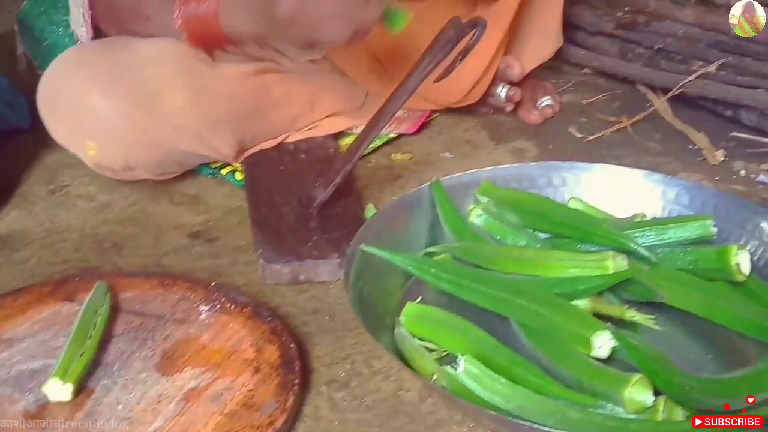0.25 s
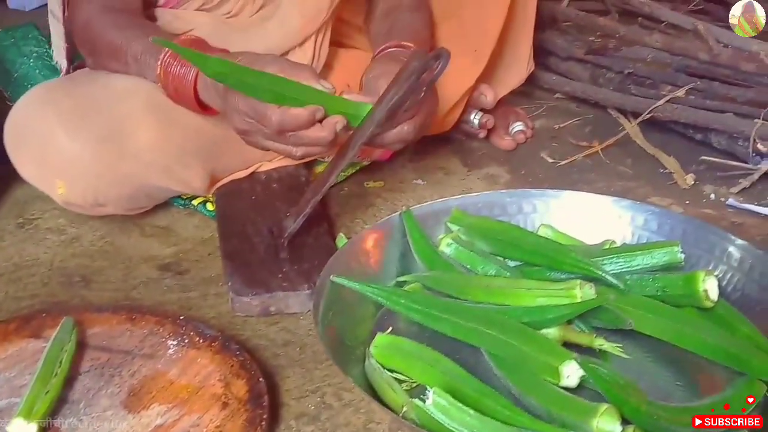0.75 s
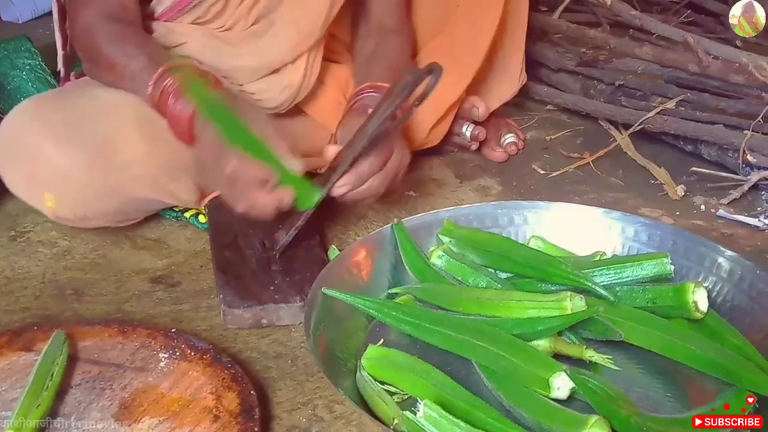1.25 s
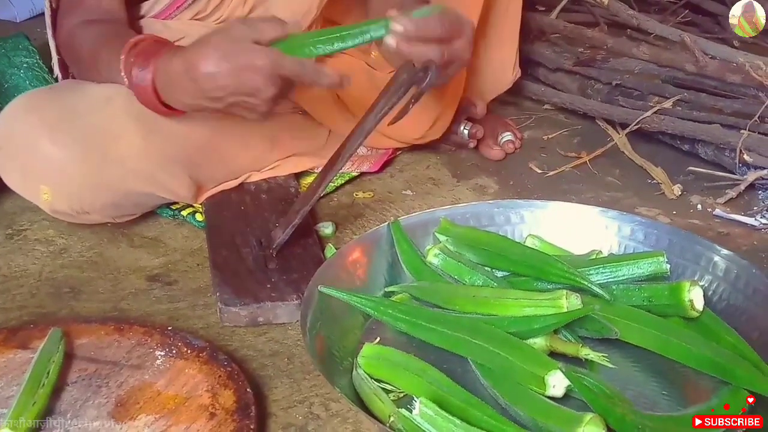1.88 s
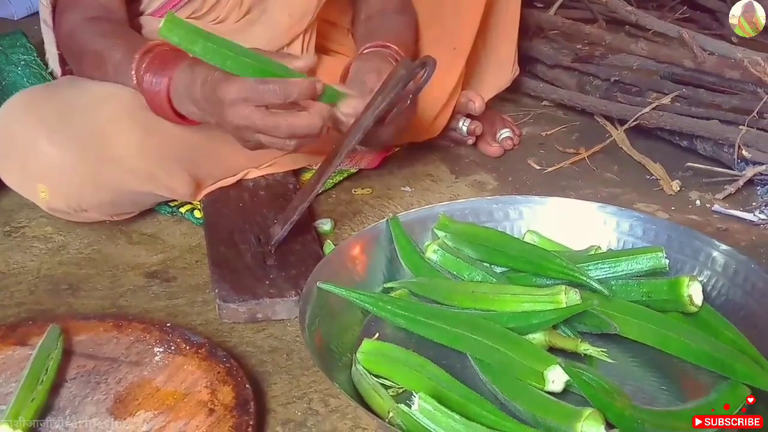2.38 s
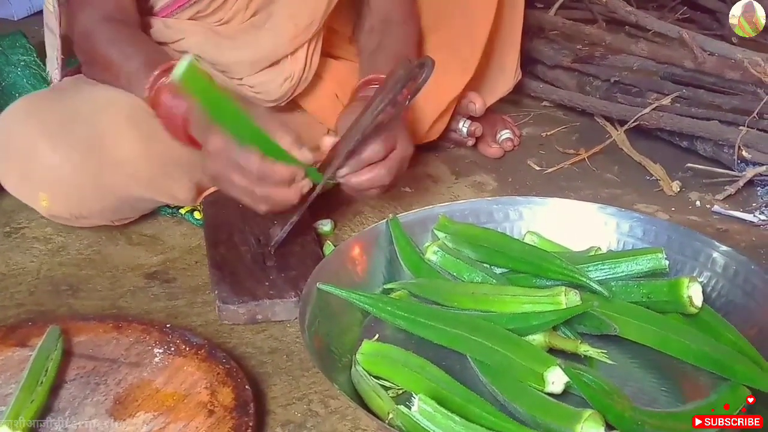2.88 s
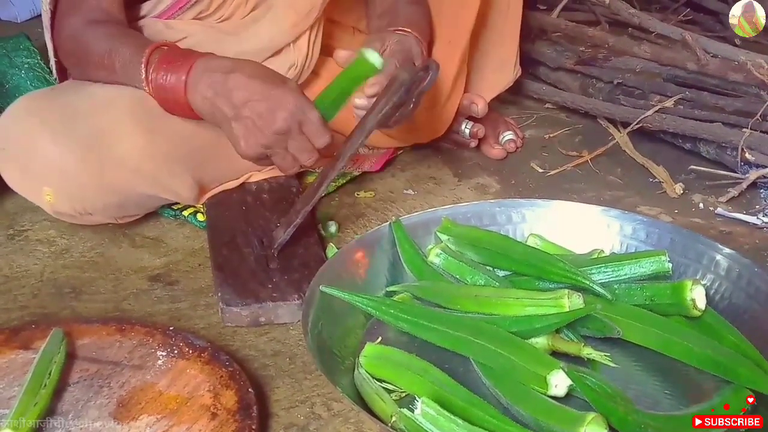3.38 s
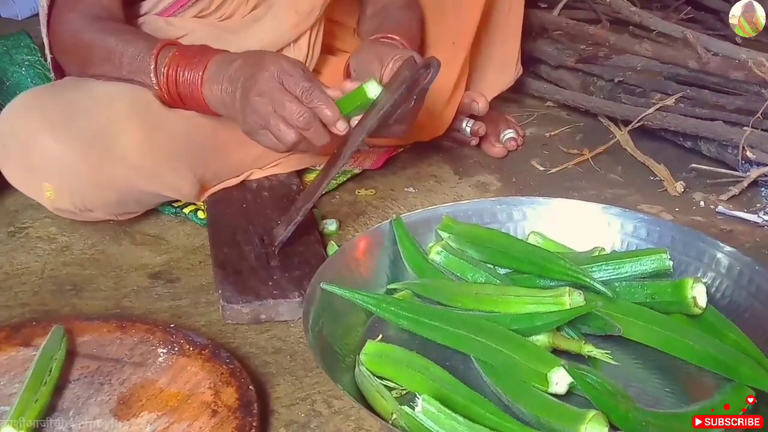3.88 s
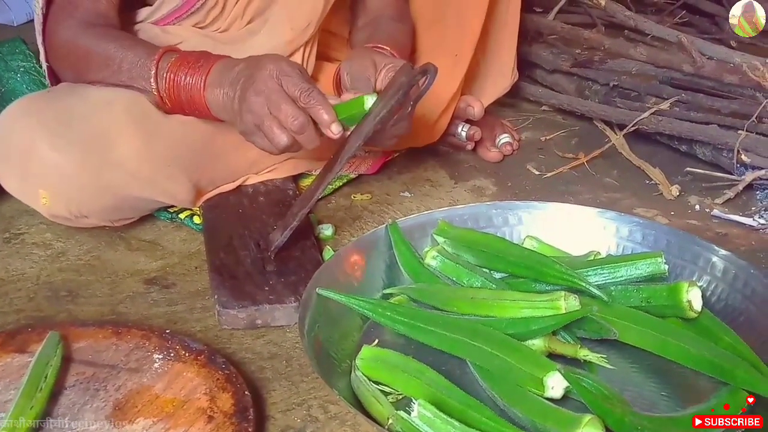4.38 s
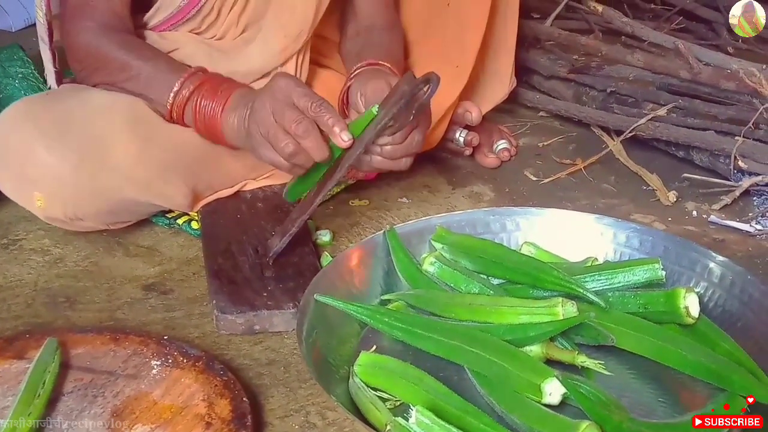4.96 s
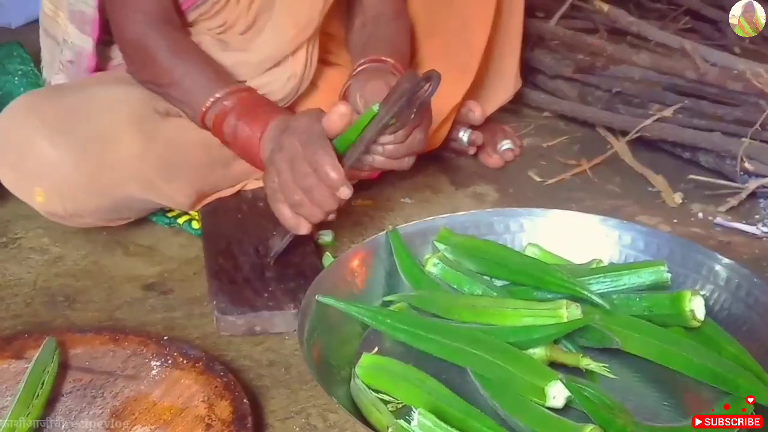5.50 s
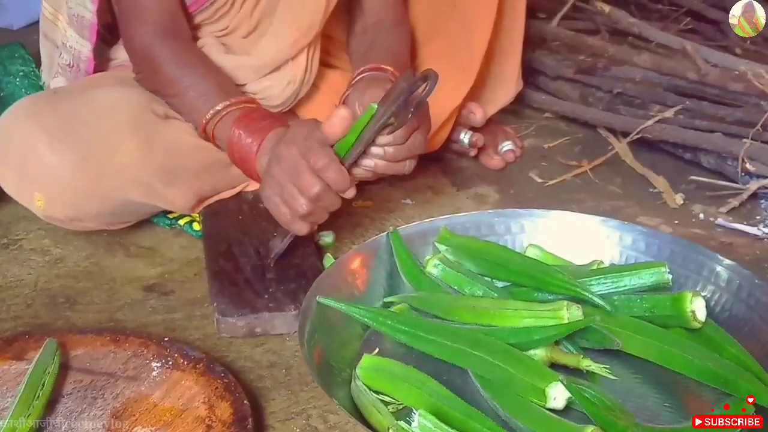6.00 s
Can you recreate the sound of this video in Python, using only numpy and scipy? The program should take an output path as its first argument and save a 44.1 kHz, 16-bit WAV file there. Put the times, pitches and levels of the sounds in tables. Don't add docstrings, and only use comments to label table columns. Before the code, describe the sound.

Close, crisp snaps and scrapes of okra on a fixed blade, glassy bangle clinks, and hens clucking and crying with hard yard echo.

```python
import sys
import numpy as np
from scipy import signal
from scipy.fft import rfft, irfft
from scipy.io import wavfile
from scipy.ndimage import uniform_filter1d

SR = 44100
rng = np.random.default_rng(int(sys.argv[2]) if len(sys.argv) > 2 else 0)


def to_wav(sig):
    pcm = np.clip(np.atleast_2d(sig), -1, 1) * 32767
    pcm = np.round(pcm).astype(np.int16)
    wavfile.write(sys.argv[1], SR, pcm.T)


def nominal_scale(level):
    x = np.asarray(level, float) / 20
    return 10 ** x


N = 275184


def evened(x):
    return x / np.sqrt(np.mean(x ** 2) + 1e-20)


def read(points, hz):
    f, value = np.transpose(points)
    return np.interp(np.log(hz + 1), np.log(f + 1), value)


def add(mix, s, sound):
    part = mix[max(round(s * SR), 0):][:len(sound)]
    part += sound[:len(part)]


def events(table, source):
    out = np.zeros(N)
    for row in table:
        add(out, *source(*row))
    return out


def along(rows, t):
    s, *columns = np.transpose(rows)
    return [np.interp(t, s, c) for c in columns]


def span(rows):
    return np.arange(rows[0][0], rows[-1][0], 1 / SR)


def resonate(x, hz, width_hz):
    turn = np.exp(2j * np.pi * np.cumsum(hz * np.ones(len(x))) / SR)
    r = np.exp(-np.pi * abs(width_hz) / SR)
    smooth = signal.lfilter([(1 - r) ** 2], [1, -2 * r, r * r], x / turn)
    return 2 * (turn * smooth).real


def colour(x, points):
    hz = np.fft.rfftfreq(len(x), 1 / SR)
    return evened(irfft(rfft(x) * nominal_scale(read(points, hz)), len(x)))


def wobble(length, smooth):
    noise = rng.standard_normal(length)
    return evened(uniform_filter1d(uniform_filter1d(noise, int(smooth)), int(smooth)))


def patchy(points, patchy_db):
    frames, hz = N // 128 + 6, np.fft.rfftfreq(512, 1 / SR)
    a, b, patches = rng.standard_normal((frames, 257, 3)).T
    patches = uniform_filter1d(uniform_filter1d(patches, size=5, axis=0), size=30, axis=1)
    level = nominal_scale(read(points, hz)[:, None] + patchy_db * evened(patches))
    return evened(signal.istft((a + 1j * b) * level, nperseg=512, noverlap=384)[1][:N])


def wind():
    # (time [s], level [dB], centre [Hz])
    hum = [(0, -81, 124.5), (1.2, -77.5, 104), (2.2, -80.5, 121.6), (2.95, -67.5, 165.4),
           (3.15, -50.5, 89.3), (3.3, -57, 199), (3.42, -49.5, 200), (3.6, -61.5, 113.4), (3.95, -56, 144),
           (4.2, -55.5, 72), (4.52, -54.5, 84.6), (4.78, -58.5, 127.3), (4.92, -70, 155),
           (5.15, -57, 120.5), (5.38, -73.5, 151), (5.58, -59.5, 124), (5.72, -59, 111), (5.9, -56, 110.7)]
    # (frequency [Hz], density [dB per Hz])
    wind_spectrum = [(20, -38), (43, -49), (86, 2.5), (193, 1), (268, -25), (400, -17.5), (520, -94),
                     (880, -120)]
    level_db, hz = along(hum, np.arange(N) / SR)
    gusts = colour(rng.standard_normal(N), wind_spectrum)
    moan = evened(resonate(rng.standard_normal(N), hz, 14))
    return nominal_scale(level_db + 2.26 * wobble(N, 790)) * evened(gusts + 1.05 * moan)


def yard():
    # (time [s], level [dB])
    yard_level = [(0, -57.5), (.35, -64.5), (.48, -77.5), (.9, -64.5), (1.05, -66.5), (1.38, -97),
                  (1.6, -68), (1.9, -86), (2.5, -65.5), (3.1, -63), (3.4, -67.5), (3.7, -63), (3.9, -62),
                  (4.5, -57.5), (5.2, -63.5), (5.4, -62.5), (6.05, -68), (6.24, -54.5)]
    # (frequency [Hz], density [dB per Hz])
    rustle = [(400, -48), (620, 0), (780, -35), (1000, 1), (1500, -18.5), (2400, -8), (3100, -22),
              (4100, -7.5), (5300, -2), (6500, -9), (8000, -19), (10000, -13.5), (12500, -55)]
    level_db = along(yard_level, np.arange(N) / SR)[0]
    return nominal_scale(level_db) * patchy(rustle, patchy_db=6.0)


def hiss(s, peak_db, swell_s, length_s):
    # (frequency [Hz], density [dB per Hz])
    air = [(1200, -12), (2000, -4), (3000, -5), (4100, 4), (5500, -5), (7500, -7), (10500, -19),
           (15500, -27.5), (17000, -64)]
    t = np.arange(int(length_s * SR) + 2000) / SR
    swell = np.sin(np.pi / 2 * np.clip(t / swell_s, 0, 1)) ** 2
    shape = swell * nominal_scale(-60 * np.maximum(t - length_s + 0.066, 0) / 0.14)
    flutter = nominal_scale(peak_db + 0.9 * wobble(len(t), 350))
    return s, flutter * colour(rng.standard_normal(len(t)), air) * shape


def croon(s, length_s, level_db, hz):
    fade_db, sag_per_s, width_hz = -10, 0.082, 110
    t = np.arange(0, length_s, 1 / SR)
    pitch_hz = hz * (1 - sag_per_s * t) + width_hz / 3 * wobble(len(t), 400)
    fuzz = evened(resonate(rng.standard_normal(len(t)), pitch_hz, width_hz))
    tone = np.sin(2 * np.pi * np.cumsum(pitch_hz) / SR) + .7 * fuzz
    return s, nominal_scale(level_db + fade_db * t / length_s) * tone * signal.windows.tukey(len(t), .4)


def clink(s, middle_db, wide_db, thin_db):
    # (frequency [Hz], level [dB], t60 [s])
    rings = [
        [(9720, 0, .17), (10450, -4, .15), (10780, -2, .2), (11250, -1, .2)],
        [(12060, 0, .17), (12350, -1, .16), (15440, -11, .14)],
        [(13120, -9, .12), (13490, -10, .12), (14350, 0, .11), (7560, -7, .11)],
        [(6500, -3, .2), (5100, -7, .22), (5900, -6, .15)],
    ]
    t, out = np.arange(7500) / SR, 0
    rattle = rng.standard_normal(len(t))
    for group_db, modes in zip((middle_db, wide_db, thin_db, wide_db), rings):
        for hz, db, t60_s in modes:
            uneven_db, detune, phase = rng.uniform(-6, 4), rng.uniform(.995, 1.005), rng.random()
            tone = np.sin(2 * np.pi * (hz * detune * t + phase))
            ring = .6 * tone + .6 * evened(resonate(rattle, hz * detune, 130))
            blur = .35 * evened(resonate(rattle[::-1], hz, 600)) * nominal_scale(-60 * t / .25)
            out = out + nominal_scale(group_db + db + uneven_db - 60 * t / t60_s) * (ring + blur)
    return s - .001, out * np.minimum(t / 0.00092, 1)


def rasp(s, peak_db, dull_db, crisp_db, stroke_s, snap_db, grain_db, chatter_db=0):
    # (frequency [Hz], density [dB per Hz])
    scrape = [(500, -21), (1000, -9), (2100, -1.5), (3400, -5), (3700, -0.5), (4000, -7), (5500, -2),
              (7500, -9.5), (10600, -19.5), (11300, -31.5)]
    chatter_hz = 90
    t = np.arange(-200, 6000) / SR
    shape = nominal_scale(-60 * np.maximum(t - stroke_s, 0) / 0.11) * np.clip(t / 0.0086, 0, 1)
    shape = shape + nominal_scale(snap_db + 8 - 60 * abs(t) / 0.032) * (t > 0)
    noise = rng.standard_normal(len(t))
    grain = nominal_scale(grain_db * np.minimum(rng.exponential(1, len(t)), 6))
    fibres = shape * evened(noise * grain)
    skips = np.cumsum(chatter_hz * (1 + .2 * wobble(len(t), 300))) / SR + rng.random()
    fibres = fibres * nominal_scale(chatter_db * (1 - 4 * (skips % 1)) / 2)
    tilt = [(f, db + (dull_db + 14.0) * np.clip((4100 - f) / 1400, 0, 1)) for f, db in scrape]
    crisp = nominal_scale(crisp_db) * colour(fibres, [(7000, -23.0), (10500, -2), (15000, -6.5), (16000, -25)])
    return s - .002 + t[0], nominal_scale(peak_db - 14.5) * (colour(fibres, tilt) + crisp) * np.std(fibres)


def cut(s, peak_db, dull_db, stroke_s, snap_db):
    crisp_db = -5.5 - 200 * stroke_s
    return rasp(s, peak_db, dull_db, crisp_db, stroke_s, snap_db, grain_db=2.7)


def syrinx(hz, rough, jitter, limp):
    flutter_db = 4
    turns = np.cumsum(hz * (1 + jitter * wobble(len(hz), 150))) / SR + rng.random()
    pulses = 0
    for k in range(2, 13):
        pulses = pulses + nominal_scale(flutter_db * wobble(len(hz), 307)) * np.cos(2 * np.pi * k * turns)
    pulses = pulses * (1 + limp * np.cos(np.pi * turns))
    puffs = (0.034 + np.exp(-(turns % 1) / 0.12)) * rng.standard_normal(len(hz))
    drive = np.sqrt(1 - rough) * evened(pulses) + np.sqrt(rough) * evened(puffs)
    low = nominal_scale(flutter_db / 2 * wobble(len(hz), 310) + 1) * np.cos(2 * np.pi * turns)
    return drive, low


def squawk(rows, cavities, rough, jitter):
    throat_width_hz, grate_db, grate_width_hz = 930, -8, 330
    t = span(rows)
    effort_db, hz, throat_hz, bright_db, low_db = along(rows, t)
    drive, low = syrinx(hz, rough, jitter, 0.23)
    top = 0
    for k, (f, width_hz, db) in enumerate(cavities):
        top = top + (-1) ** k * nominal_scale(db) * resonate(drive, f, width_hz)
    air = resonate(rng.standard_normal(len(t)), 0.905 * throat_hz, grate_width_hz)
    grate = nominal_scale(grate_db) * evened(air)
    throat = resonate(resonate(drive, throat_hz, throat_width_hz), throat_hz, throat_width_hz)
    voice = evened(evened(throat) + grate) + nominal_scale(bright_db) * evened(top) + nominal_scale(low_db) * low
    effort = nominal_scale(effort_db + 1.5 * wobble(len(t), 270))
    return t[0], effort * voice * signal.windows.tukey(len(t), .3)


def hoarse_cry(s, length_s, effort_db, top_hz, sag, extra_db=0, rough=.2, jitter=.011):
    # (frequency [Hz], width [Hz], level [dB])
    beak_open = [(2094, 310, 12.5), (2583, 560, 10.5), (3763, 150, 9.5)]
    chest_db = -16.5
    u = np.linspace(0, 1, num=24)
    hz = top_hz * (1 - sag * np.sin(np.pi / 2 * np.clip(u / .6, 0, 1)) ** 2)
    effort_db = effort_db + 2.5 * np.exp(-u / 0.89) - 9.5 * u ** 3
    throat_hz = 395 + 1.47 * hz
    bright_db = extra_db - 9.5 + 0.029 * (hz - 600)
    rows = np.transpose([s + length_s * u, effort_db, hz, throat_hz, bright_db, chest_db + 0 * u])
    return squawk(rows, beak_open, rough, jitter)


def cluck(s, peak_db, second_hz, low_db, beak_db, length_s):
    beak_hz, side_hz, side_db, third_db = 2159, 2429, -6.5, -7.5
    u = np.linspace(0, 1, int(np.clip(length_s, .02, .15) * SR * 2))
    scoop = rng.uniform(.03, .1) * np.exp(-u / .15)
    sag = rng.uniform(.05, .16) * u ** 2
    hz = second_hz / 2 * (1.02 - scoop - sag)
    drive, low = syrinx(hz, .3, .024, .75 * np.exp(-u / .3))
    voice = resonate(drive, 2 * hz, 163) + nominal_scale(third_db) * resonate(drive, 3 * hz, 150)
    gape_hz = 1200 + rng.uniform(120, 280) * u
    voice = evened(voice + 0.96 * resonate(drive, gape_hz, 170))
    breath = drive + 2.0 * rng.standard_normal(len(u))
    beak = resonate(breath, beak_hz * rng.uniform(0.91, 1.05), 90)
    beak = evened(beak + nominal_scale(side_db) * resonate(breath, side_hz, 200))
    moment = np.exp(-((u - .35) / 0.17) ** 2)
    voice = voice + moment * nominal_scale(low_db + 8.5) * low
    voice = voice + np.roll(moment, len(u) // 8) * nominal_scale(beak_db + 3) * beak
    level = nominal_scale(peak_db - 12.0 + 2.78 * wobble(len(u), 155))
    return s - .01, level * voice * np.sin(np.pi * u ** 0.64) ** 2


def near_cluck(s, peak_db, second_hz, length_s, beak_db):
    fuller_from_s, chest_db, fuller_db = 3, -19.5, 8
    return cluck(s, peak_db, second_hz, chest_db + fuller_db * (s > fuller_from_s), beak_db, length_s)


def far_cluck(s, peak_db, second_hz, length_s, beak_db):
    return cluck(s, peak_db, second_hz, -38, beak_db, length_s)


def clear_cry(rows):
    # (frequency [Hz], width [Hz], level [dB])
    upper = [(2600, 320, -3), (3530, 250, -1), (4340, 760, -2.5), (5144, 100, 3.5)]
    throat_over_pitch = 2.636
    rows = [(s, effort_db, hz, throat_over_pitch * hz, bright_db, chest_db)
            for s, effort_db, hz, bright_db, chest_db in rows]
    return squawk(rows, upper, .09, .007)


def sweep(s, peak_db, stroke_s, snap_db):
    return rasp(s, peak_db, -17, -69, stroke_s, snap_db, grain_db=0.0, chatter_db=5.0)


def bump(s, peak_db, hz):
    t = np.arange(4000) / SR
    knock = rng.standard_normal(len(t))
    body = evened(resonate(knock, hz, 52)) + 0.94 * evened(resonate(knock, 1800, 930))
    return s - .005, nominal_scale(peak_db - 60 * t / 0.22) * body * np.minimum(t / 0.025, 1)


def shrill_cry(*row):
    return hoarse_cry(*row, extra_db=15, rough=.15, jitter=.008)


def hens():
    # (start [s], length [s], level [dB], pitch [Hz])
    croons = [(0, .06, -57, 935), (.385, .19, -55, 650), (1.13, .22, -66, 454), (3.85, .1, -59, 606),
              (5.26, .16, -61, 409), (5.36, .08, -60, 1265), (5.49, .17, -62, 690), (5.66, .2, -61, 670),
              (5.86, .12, -63, 650), (6.055, .07, -67, 4090), (2.15, .3, -66, 720), (2.62, .2, -65, 700),
              (4.5, .12, -61, 1260), (4.47, .13, -65, 2500), (.06, .15, -59, 640), (3.6, .1, -62, 700),
              (2.95, .08, -57, 570), (5.98, .17, -61, 620)]
    # (start [s], length [s], effort [dB], pitch [Hz], sag [share])
    hoarse = [
        (.057, 0.17, -46.5, 726, 0.17),
        (.615, 0.125, -45.5, 613.7, 0.0293),
        (2.895, .18, -46.5, 727, .17),
        (3.785, 0.055, -42, 420.4, 0.017),
    ]
    # (time [s], peak [dB], second harmonic [Hz], length [s], beak [dB])
    clucks = [(0.288, -36.5, 970, 0.056, -17), (0.499, -40.5, 977, 0.032, -13.5),
              (1.479, -35, 965, 0.037, -13.5), (1.716, -37, 960, 0.033, -16.5),
              (1.933, -35, 960, 0.069, -19), (3.195, -31.5, 991, 0.045, -20),
              (3.763, -30.5, 985, 0.031, -19), (4.115, -33, 1006, 0.052, -18),
              (4.738, -35, 986, 0.043, -19), (5.002, -40, 985, 0.033, -32), (5.252, -39.5, 963, 0.043, -16),
              (5.475, -47, 1002, 0.046, -7), (5.523, -38.5, 952, 0.05, -15.5),
              (5.878, -39.5, 951, 0.033, -23)]
    # (time [s], peak [dB], second harmonic [Hz], length [s], beak [dB])
    far_clucks = [(0.522, -31.5, 998, 0.026, -23), (0.568, -31.5, 1124, 0.026, -36),
                  (0.965, -47, 953, 0.055, -4.5), (1.253, -42.5, 924, 0.028, -12),
                  (2.136, -43.5, 927, 0.051, -12), (2.3, -41.5, 897, 0.014, -15),
                  (2.606, -45.5, 1005, 0.11, -8), (3.375, -39, 946, 0.048, -8.5),
                  (3.917, -46, 962, 0.052, -4.5), (4.513, -42, 917, 0.022, -34),
                  (4.646, -45, 952, 0.04, -7), (4.862, -40.5, 985, 0.026, -11.5),
                  (5.054, -37, 930, 0.026, -13), (5.951, -44.5, 1012, 0.038, -15),
                  (1.97, -37.5, 1031, 0.04, -21), (2.819, -41, 949, 0.036, -7),
                  (3.68, -42.5, 906, 0.041, -6.5), (6.12, -42.5, 921, 0.035, -14.5),
                  (4.765, -41, 817, 0.031, -28), (4.92, -54, 1002, 0.025, 3), (4.145, -35, 849, 0.026, -28),
                  (3.149, -39, 930, 0.045, -8.5), (3.44, -34.5, 1178, 0.048, -25),
                  (5.69, -42, 934, 0.038, -10)]
    # (time [s], effort [dB], pitch [Hz], brightness [dB], chest [dB])
    ringing = [
        [(.56, -41, 535, 1, -14), (.582, -39.5, 504.5, -13, -13), (.62, -40, 488.5, -14, -11),
         (.65, -44, 448, -15, -17), (.72, -42, 445.5, -13.5, -11.5), (.74, -47.5, 444.5, -11, -6),
         (.78, -54, 435, -8, -10)],
        [(3.42, -54, 505, -19.5, -9), (3.46, -44.5, 489, -23.5, -4.5), (3.488, -46, 485, -27.5, -5),
         (3.51, -40.5, 410.5, -36, -9), (3.535, -43, 410, -29, -12)],
        [(3.53, -45, 536, -24.5, -12), (3.57, -44, 520, -35, -15.5), (3.6, -48, 505, -28, -18),
         (3.65, -61, 500, -16, -15)],
        [(4.178, -30, 538, 1, 10), (4.2, -41, 539.5, -20, -3), (4.23, -37, 508, -11, -4.5),
         (4.256, -40, 510, -17, -1), (4.285, -34.5, 497, -14.5, -8.5), (4.305, -36.5, 516, -9.5, -4),
         (4.33, -37, 517, -7.5, -4.5), (4.366, -48, 519, -19, -16), (4.4, -58, 518, -8.5, -13)],
    ]
    # (start [s], length [s], effort [dB], pitch [Hz], sag [share])
    shrill = [
        (3.474, 0.135, -57, 653.5, 0.01),
    ]
    out = events(croons, croon) + events(hoarse, hoarse_cry) + events(clucks, near_cluck)
    out = out + events(far_clucks, far_cluck) + events(shrill, shrill_cry)
    for rows in ringing:
        add(out, *clear_cry(rows))
    return signal.sosfilt(signal.butter(6, 370, "high", fs=SR, output="sos"), out)


def walls(x):
    # (frequency [Hz], t60 [s])
    decay = [(500, 0.18), (950, 0.34), (2300, 0.34), (3500, 0.38), (6000, 0.37), (9200, 0.33),
             (14000, 0.24)]
    taps = np.zeros(SR // 2)
    at = np.arange(260, len(taps) - 20, 20)
    taps[at + rng.integers(0, 20, len(at))] = rng.choice([-1., 1.], len(at))
    hz, t, z = signal.stft(taps, SR, nperseg=256)
    tail = signal.istft(z * nominal_scale(-60 * t / read(decay, hz)[:, None]), SR, nperseg=256)[1]
    return signal.fftconvolve(x, tail / np.linalg.norm(tail))[:N]


def scene():
    # (time [s], peak [dB], swell [s], length [s])
    hisses = [
        (0, -69, 0.014, 0.045),
        (3.186, -47.5, 0.032, 0.069),
        (3.438, -56, 0.054, 0.15),
        (3.765, -43.5, 0.046, 0.077),
        (4.108, -61.5, 0.044, 0.12),
        (4.183, -44.5, 0.016, 0.2),
        (4.641, -62, 0.05, 0.18),
    ]
    # (time [s], middle [dB], wide [dB], thin [dB])
    clinks = [(0.0145, -44, -33, -19.5), (0.0648, -42, -41, -57), (0.0982, -31.5, -30.5, -32),
              (0.2069, -37.5, -58, -71), (0.7864, -70, -50, -41), (1.2346, -39.5, -33, -34),
              (1.6007, -52.5, -45, -95), (2.4693, -83, -93, -48), (2.863, -44, -52, -39),
              (3.132, -37, -36, -50), (3.4954, -46.5, -71, -34), (3.642, -45, -64, -88),
              (3.9474, -56.5, -86, -90), (4.4386, -53, -42.5, -69), (4.785, -54.5, -85, -92),
              (4.848, -60, -56, -37.5), (5.179, -39, -79, -86), (5.4327, -37, -50, -52),
              (5.475, -40, -55, -60), (5.5153, -39, -41.5, -55), (5.55, -45, -54, -65),
              (5.5847, -37.5, -36, -67), (5.6286, -40, -32, -68), (5.8306, -35, -36, -44),
              (5.9564, -46.5, -39.5, -71), (5.9894, -71, -56, -43), (6.125, -28, -31, -41)]
    # (time [s], peak [dB], dull part [dB rel], stroke [s], snap [dB])
    cuts = [(0.0154, -52, -18, 0.1, 10), (0.0967, -36, -10, 0.084, -3), (0.7402, -32, -16.5, 0.079, 0.2),
            (1.033, -44, -38, 0.0081, -15), (1.1201, -27, -21.5, 0.046, -4),
            (1.1742, -26.5, -17.5, 0.01, -6), (1.706, -32, -43, 0.018, -1.5),
            (2.5545, -42, -27, 0.0077, -30), (2.7819, -34.5, -28, 0.047, -16),
            (2.825, -34, -27, 0.033, 7.5), (2.92, -29, -7, 0.087, -18), (5.81, -38.5, 7, 0.005, 7),
            (4.6906, -44, -39, 0.03, 10), (4.9227, -39.5, -31, 0.016, -12),
            (5.2757, -37.5, -40, 0.016, -41), (5.5174, -39, -29, 0.037, -9),
            (5.5824, -34.5, -18, 0.097, -19), (5.6366, -30, -9.5, 0.024, 4), (5.758, -41.5, -13, 0.062, 0),
            (5.7937, -25.5, -15, 0.049, -5.5), (5.8289, -36.5, 36, 0.049, 10),
            (6.2144, -42.5, -26, .04, -21)]
    # (time [s], peak [dB], stroke [s], snap [dB])
    sweeps = [(0.5831, -31.5, 0.038, -6), (0.6344, -27, 0.057, -4), (1.0809, -27, 0.028, -12),
              (1.4255, -30, 0.047, -26), (1.9589, -29, 0.044, -27), (2.0447, -30, 0.076, -4),
              (2.1629, -29, 0.056, -7.5), (2.2394, -31, 0.041, -4.5), (2.2924, -30, 0.04, -32),
              (2.3459, -30, 0.072, -24), (2.4074, -32.5, 0.053, -11), (2.6092, -27, 0.059, -6)]
    # (time [s], peak [dB], pitch [Hz])
    bumps = [
        (0.88, -51.5, 298),
        (2.777, -56.5, 405.4),
        (4.903, -61, 323),
        (5.328, -60, 346),
    ]
    voices = hens() + events(hisses, hiss)
    rasps = events(sweeps, sweep) + events(cuts, cut)
    glass = events(clinks, clink)
    hens_heard = nominal_scale(2.5) * voices + nominal_scale(-0.5) * walls(voices)
    hands = nominal_scale(-3.5) * rasps + nominal_scale(-12.0) * glass
    hands = hands + walls(nominal_scale(-7.5) * rasps + nominal_scale(-18.0) * glass)
    near = wind() + events(bumps, bump)
    return (hens_heard + hands + yard() + near)[None]


def roll_off(x):
    return signal.sosfilt(signal.butter(12, 16340, fs=SR, output="sos"), x)


def record(dry):
    # (frequency [Hz], density [dB per Hz])
    floor_spectrum = [(18, -50), (30, -6), (109, 10), (780, -18), (3580, -17.5), (6550, -13), (8300, -16),
                      (16000, -23)]
    gate_db, floor_db, edge_hz = -85, -76, 15850
    z = signal.stft(dry[0], nperseg=512, noverlap=384)[2]
    power = uniform_filter1d(uniform_filter1d(abs(z) ** 2, size=5, axis=0), size=6, axis=1)
    gain = power / (power + nominal_scale(2 * gate_db))
    kept = signal.istft(z * gain, nperseg=512, noverlap=384)[1][:N]
    own = nominal_scale(floor_db) * patchy(floor_spectrum, patchy_db=1.2)
    thin = signal.sosfilt(signal.butter(2, 55, "high", fs=SR, output="sos"), kept + own)
    lowpass = signal.firwin(401, edge_hz, window=("kaiser", 9), fs=SR)
    limited = signal.oaconvolve(thin, lowpass, "same")
    return roll_off(limited[None])


dry = scene()
out = record(dry)
to_wav(out)
```